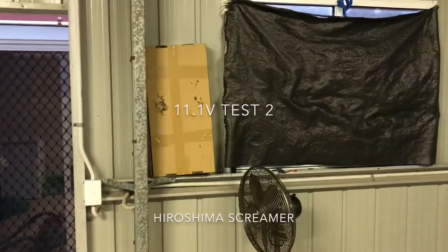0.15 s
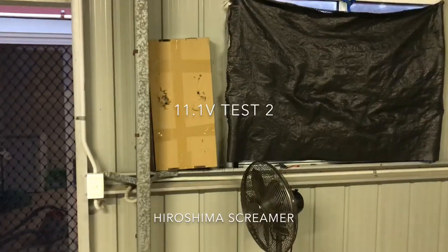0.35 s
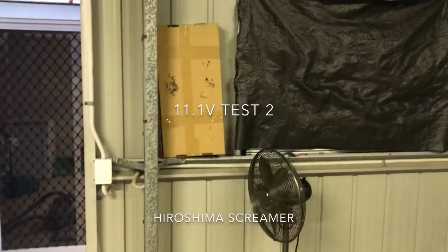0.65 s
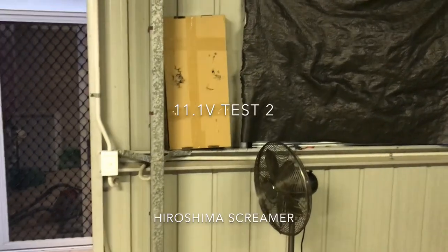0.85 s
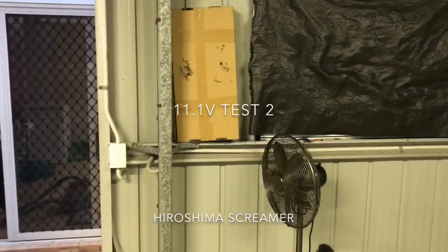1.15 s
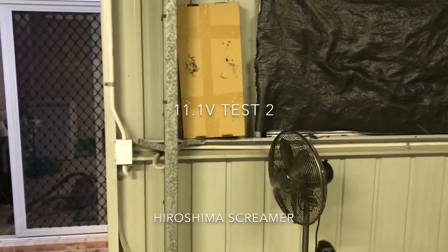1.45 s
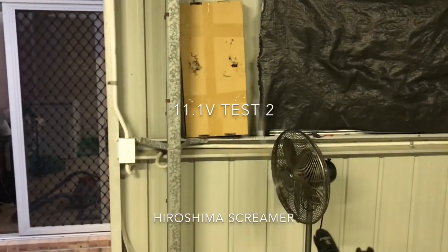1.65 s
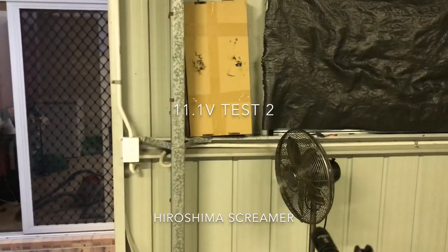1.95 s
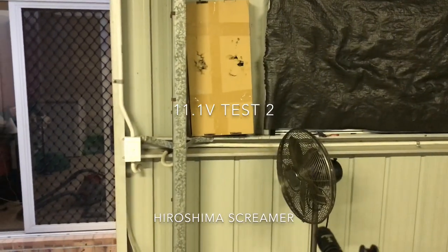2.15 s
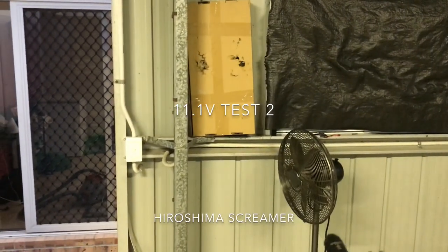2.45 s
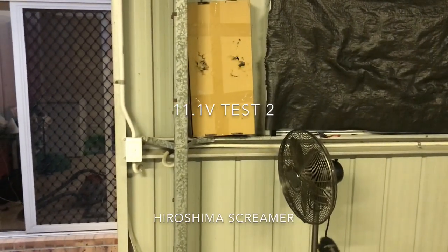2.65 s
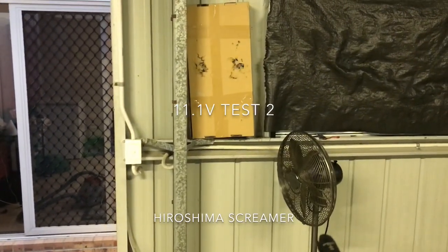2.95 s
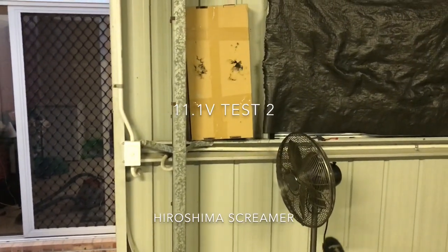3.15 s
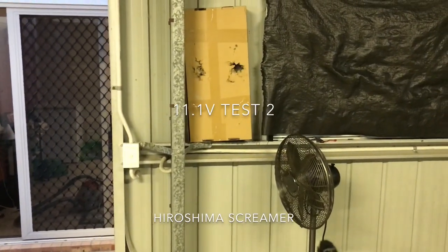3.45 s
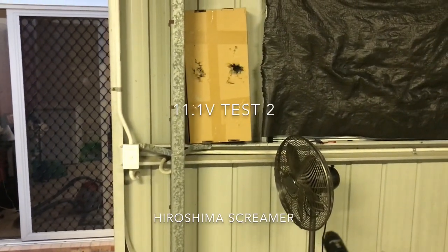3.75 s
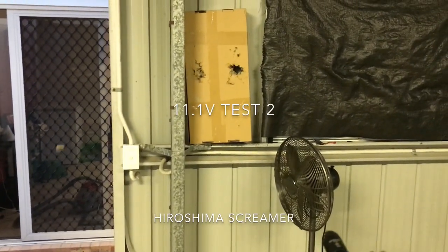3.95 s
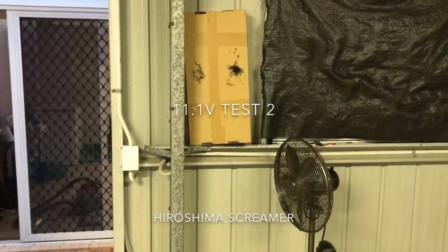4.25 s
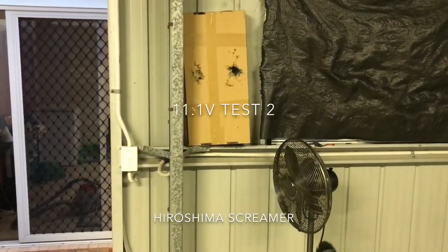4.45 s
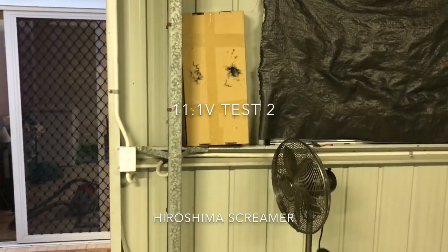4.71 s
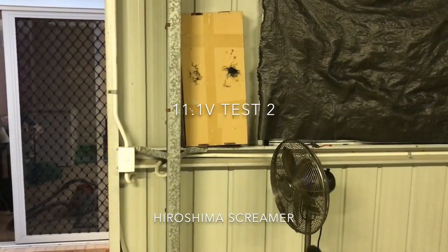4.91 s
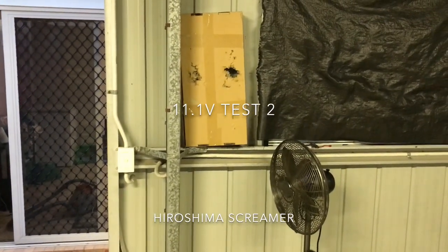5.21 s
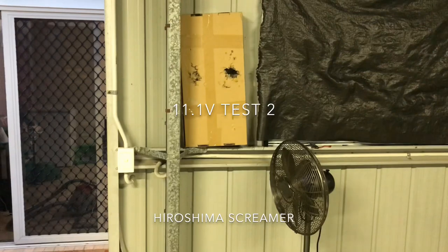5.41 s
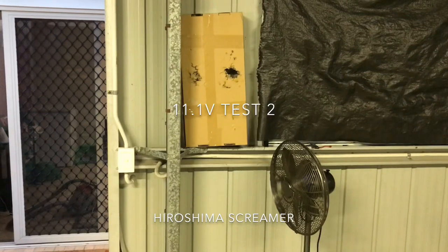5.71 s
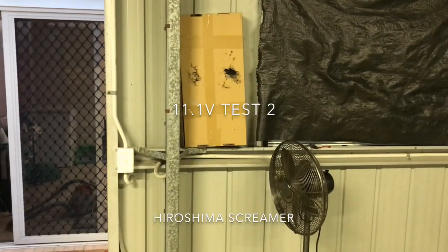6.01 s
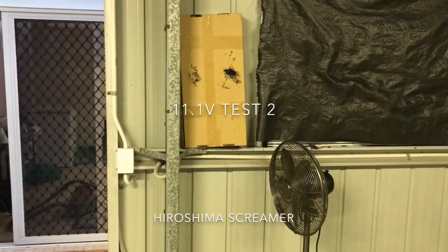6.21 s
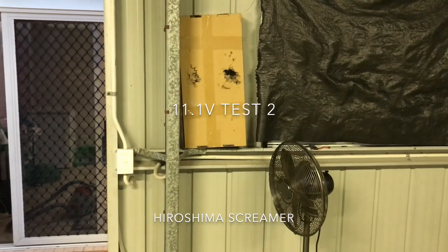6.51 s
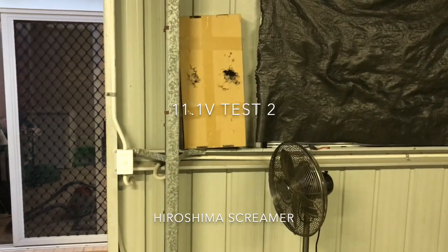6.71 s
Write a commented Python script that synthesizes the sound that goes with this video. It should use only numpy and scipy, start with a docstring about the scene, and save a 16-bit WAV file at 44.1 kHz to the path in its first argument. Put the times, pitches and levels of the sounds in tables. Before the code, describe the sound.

For the first 1.1 s there is only quiet low rumble and a very faint high electrical whine. A tiny trigger click at 1.12 s leads into a short upward gear whine, and at 1.2 s an electric gel blaster opens up close to the phone: dense, dry plastic knocks, sharp ticks and air puffs at about 21.5 per second over grinding gears. Each pellet lands some 23 ms later with a wet splat, papery crack, hollow box knock and brief ring. Fire stops about 2.2 s, the tin shed ringing on, resumes at 2.44 s and runs steadily to about 6.2 s, impacts shifting in pitch and weight, some standing out. Strong low microphone pops hit near 3.0 and 3.5 s. After another brief gap, a last burst starts at 6.35 s and continues almost to the end, around 6.9 s.

```python
"""Gel blaster in a tin shed

An electric gel blaster fires three bursts, about 21.5 shots a second, at a cardboard box.
A motor winds the piston back through whirring gears; the piston slams home as knocks, ticks and puffs.
About 23 ms later each gel ball lands: filtered pushes and noise crumples, and a ringing sine for the panel.
Now and then a stray drop or puff of air pops the microphone, a slowing sine swing.
Decaying noise echoes make the shed ring on between bursts, over a quiet rumble and a faint whine."""
import sys
import numpy as np
from scipy import signal
from scipy.fft import rfft, irfft
from scipy.io import wavfile
from scipy.ndimage import uniform_filter1d

SR = 44100
rng = np.random.default_rng(int(sys.argv[2]) if len(sys.argv) > 2 else 0)


def log_audio(samples):
    """Write samples as a 16-bit WAV file to the path given in sys.argv[1]."""
    # one column per channel
    frames = np.atleast_2d(samples).T
    # limit to full scale, then quantise
    limited = np.clip(frames, -1, 1)
    pcm = np.round(limited * 32767).astype(np.int16)
    wavfile.write(sys.argv[1], SR, pcm)


N = 302967

# Bursts of fire. Each row: motor on in seconds, first shot in seconds, motor off in seconds.
BURSTS = [(1.156, 1.2035, 2.235), (2.396, 2.4402, 6.175), (6.305, 6.3452, 6.9)]
# Spectrum of the gear noise. Each row: frequency in Hz, relative level in dB.
GEAR_SPECTRUM = [(100, -48), (400, -5), (900, 0.5), (1900, -4), (2700, -4), (4200, -7), (4900, -14),
                 (5600, -8), (7600, -12.5), (9200, -11.5), (10500, -14), (16000, -22.5)]


def amp(db):
    """Decibels to gain."""
    return 10 ** (np.asarray(db) / 20)


def unit(x):
    """Scale to rms 1."""
    return x / np.sqrt(np.mean(x ** 2) + 1e-20)


def along(points, hz):
    """Interpolate (Hz, value) points on a log frequency axis."""
    point_hz, value = np.transpose(points)
    return np.interp(np.log(hz + 1), np.log(point_hz), value)


def coloured(x, spectrum):
    """Filter x with a causal, minimum-phase response of unit energy that has this spectrum."""
    size = 4096
    gain = amp(along(spectrum, np.fft.rfftfreq(size, 1 / SR)))
    # folding the cepstrum makes the response causal
    cepstrum = irfft(np.log(gain))
    cepstrum[1:size // 2] *= 2
    cepstrum[size // 2 + 1:] = 0
    response = irfft(np.exp(rfft(cepstrum)))
    return signal.fftconvolve(x, response / np.linalg.norm(response))[:len(x)]


def add(track, start_s, sound):
    """Mix a sound into a track at a time."""
    start = int(np.clip(round(start_s * SR), 0, N))
    track[start:start + len(sound)] += sound[:N - start]


def grit(size, spiky_db):
    """Noise of rms 1 made of tiny contacts of unequal force."""
    force = np.repeat(rng.standard_normal(size // 16 + 1), 16)[:size]
    return unit(rng.standard_normal(size) * amp(spiky_db * force))


def shot_times():
    """While the motor is powered, one shot follows another at the drifting pace of the gearbox."""
    # Each row: time in seconds, interval from shot to shot in seconds.
    pace = [(1.2, .0466), (1.5, .04595), (2.0, .046), (2.2, .047), (2.44, .0463), (3.6, .0465),
            (4.3, .0466), (5.2, .0466), (5.6, .04645), (6.4, .0465)]
    pace_s, interval_s = np.transpose(pace)
    shots = []
    for _, shot_s, off_s in BURSTS:
        while shot_s < off_s:
            shots.append(shot_s)
            shot_s += np.interp(shot_s, pace_s, interval_s)
    return np.array(shots)


def piston(knock_gain_db=12.7, tick_gain_db=7.5, tick_t60_s=.0016, air_gain_db=-7,
           air_width_s=.0018, looseness_s=.00007, path_scatter_s=.0003):
    """Each slam knocks the plastic shell, ticks sharply and spits a puff of air; near walls repeat it."""
    # Contacts in a slam. Each row: delay after the shot in seconds, relative shell knock in dB,
    # relative sharp tick in dB.
    contacts = [(-.0013, -2, -5.5), (0, 1, -0.5), (.0011, 0.5, -3.5), (.0022, -5.5, -19.5)]
    # Reflections off nearby walls. Each row: delay in seconds, level in dB.
    walls = [(.0076, -11.5), (.0085, -9), (.015, -13.5)]
    # Spectra of the shell, and of the ticks and air. Each row: frequency in Hz, relative level in dB.
    shell_spectrum = [(25, -52), (45, -14), (70, -6.5), (100, -12), (135, -4.5), (190, 0.5), (270, 9),
                      (380, -20.5), (560, -6), (740, -12), (940, 4.5), (1130, -9.5), (1750, -2.5),
                      (2120, 3.5), (2500, -7), (7600, -18), (16000, -22)]
    air_spectrum = [(30, -33), (100, -18), (500, -4), (1000, -9), (2100, -9.5), (2800, -32), (4300, -12),
                    (4900, -19), (5600, -12.5), (7600, -24), (9200, -14), (10500, -21.5), (12000, -18),
                    (16000, -21)]
    slam_db, slam_scatter_db = -11, 0.98
    direct_s = .00036

    knocks, puffs = np.zeros(N), np.zeros(N)
    t = np.arange(SR // 100) / SR
    middle_s = t[-1] / 2
    puff_shape = np.exp(-.5 * ((t - middle_s) / air_width_s) ** 2)
    shots = shot_times()
    shot_levels_db = slam_db + slam_scatter_db * rng.standard_normal(len(shots))
    for shot_s, shot_db in zip(shots, shot_levels_db):
        for delay_s, path_db in [(direct_s, 0), *walls]:
            arrival_s = shot_s + delay_s + path_scatter_s * rng.standard_normal()
            level_db = shot_db + path_db
            for contact_s, knock_db, tick_db in contacts:
                touch_s = arrival_s + contact_s + looseness_s * rng.standard_normal()  # play in the parts
                add(knocks, touch_s, amp([level_db + knock_db + knock_gain_db]))
                tick_gain = amp(level_db + tick_db + tick_gain_db - 60 * t / tick_t60_s)
                add(puffs, touch_s, tick_gain * rng.standard_normal(len(t)))
            puff = puff_shape * rng.standard_normal(len(t))
            add(puffs, arrival_s - middle_s, amp(level_db + air_gain_db) * puff)
    return coloured(knocks, shell_spectrum) + coloured(puffs, air_spectrum)


def landings():
    """One ball lands a flight time after each shot; rows of time in s, splat, crack and knock in dB."""
    # Landing levels as the aim wanders over the box. Each row: time in seconds,
    # relative wet splat in dB, relative cardboard crack in dB, relative hollow box knock in dB.
    aim = [(1.3, -12, -16, -29), (1.52, -15.5, -22, -17.5), (1.8, -16.5, -27, -20.5), (1.98, -14, -19, -15),
           (2.2, -17, -16, -19), (2.5, -19.5, -17.5, -21.5), (2.88, -14.5, -24, -19),
           (3.08, -16.5, -39, -29), (3.35, -24, -26, -28), (3.65, -19, -29, -21), (3.88, -27, -16.5, -19.5),
           (4.05, -28, -19.5, -25.5), (4.24, -14.5, -14, -20), (4.52, -29, -29, -29.5),
           (4.76, -24, -16.5, -21), (4.96, -19, -32, -18), (5.28, -19, -39, -22), (5.53, -18.5, -19, -20.5),
           (5.8, -18.5, -37, -29), (6.45, -15.5, -22, -22.5), (6.87, -16, -17.5, -19.5)]
    # Balls that land squarely and stand out; same columns as the aim.
    square_hits = [(1.2238, -11, -15, -11.5), (1.3212, -11, -34, -42), (1.4578, -13.5, -16, -17),
                   (2.5121, -11.5, -10, -27), (3.2518, -16, -9.5, -22), (3.5309, -16.5, -12, -31),
                   (3.7156, -16, -29, -21), (3.8093, -12.5, -41, -17), (4.18, -21, -14, -21),
                   (4.647, -10, -35, -44), (4.6951, -27, -14.5, -18), (4.8353, -32, -12, -32),
                   (5.1126, -24, -14.5, -25), (5.3465, -14.5, -26, -19.5), (5.4846, -23, -12, -17.5),
                   (5.7655, -13.5, -21, -15), (5.857, -13, -19, -29), (5.9972, -33, -11, -20),
                   (6.0463, -29, -10.5, -28), (6.0902, -18, -12, -15.5), (6.368, -12.5, -17, -14.5),
                   (6.4631, -16, -12.5, -16)]
    flight_s, flight_scatter_s = .0228, .0008
    ball_scatter_db, part_scatter_db = 1.5, 2

    shots = shot_times()
    chance = rng.standard_normal((len(shots), 5))
    land_s = shots + flight_s + flight_scatter_s * chance[:, 0]
    aim_s, *parts_db = np.transpose(aim)
    levels_db = np.transpose([np.interp(land_s, aim_s, part_db) for part_db in parts_db])
    levels_db = levels_db + ball_scatter_db * chance[:, 1:2] + part_scatter_db * chance[:, 2:]
    hits = np.column_stack([land_s, levels_db])
    for square in square_hits:
        hits[np.argmin(np.abs(land_s - square[0]))] = square
    return hits


def smacks(hits, spectrum, t60_s, gain_db, push_db, spiky_db):
    """One part of every landing: a single push, and a short crumple that dies away."""
    track, t = np.zeros(N), np.arange(SR // 16) / SR
    for hit_s, hit_db in hits:
        add(track, hit_s, amp([hit_db + push_db]))
        add(track, hit_s, amp(hit_db + gain_db - 60 * t / t60_s) * grit(len(t), spiky_db))
    return coloured(track, spectrum)


def panel(times_s, ring_db=4, detune=0.048):
    """Every landing rings the cardboard at a pitch set by where it strikes."""
    # Panel under the point of aim. Each row: time in seconds, pitch in Hz, relative level in dB.
    ringing = [(1.22, 672, -14), (1.55, 590, -22.5), (1.75, 570, -46), (2.0, 530, -14), (2.3, 580, -41),
               (2.5, 1114, -17.5), (2.75, 1147, -20), (3.1, 973, -21.5), (3.72, 1220, -28),
               (3.85, 1195, -15), (4.1, 1210, -13.5), (4.28, 1180, -46), (4.36, 570, -23),
               (4.8, 614, -20.5), (5.3, 576, -20.5), (5.7, 574, -33), (6.87, 612, -21.5)]
    when_s, pitch_hz, pitch_db = np.transpose(ringing)
    t60_s = .06
    track, t = np.zeros(N), np.arange(SR // 8) / SR
    for hit_s, (pitch_chance, force_db) in zip(times_s, rng.standard_normal((len(times_s), 2))):
        hz = np.interp(hit_s, when_s, pitch_hz) * (1 + detune * pitch_chance)
        level_db = np.interp(hit_s, when_s, pitch_db) + ring_db + force_db
        add(track, hit_s, amp(level_db - 60 * t / t60_s) * np.sin(2 * np.pi * hz * t))
    return track


def target():
    """The gel splats, the cardboard face cracks and rings, and the box knocks."""
    # Spectra of the three parts. Each row: frequency in Hz, relative level in dB.
    splat_spectrum = [(900, -50), (2400, 1), (3800, 3), (4900, 0.5), (5500, 0.5), (7600, -10), (9200, -2.5),
                      (10500, -9.5), (16000, -12)]
    crack_spectrum = [(60, -36.5), (500, -10), (900, 0), (1220, -2), (1600, -2.5), (2200, -9), (3200, -7.5),
                      (8000, -34.5)]
    box_spectrum = [(50, -64), (130, -13.5), (300, -3), (430, -3.5), (600, 1), (760, -8), (900, 0),
                    (1200, -41), (4000, -24)]
    box_lag_s = .0018  # the hollow answers just after the face

    hits = landings()
    box_hits = hits[:, [0, 3]] + [box_lag_s, 0]
    splat = smacks(hits[:, [0, 1]], splat_spectrum, t60_s=.06, gain_db=-3, push_db=18, spiky_db=-0.5)
    crack = smacks(hits[:, [0, 2]], crack_spectrum, t60_s=.073, gain_db=2, push_db=3, spiky_db=2.5)
    knock = smacks(box_hits, box_spectrum, t60_s=.068, gain_db=1.5, push_db=19.5, spiky_db=6)
    return splat + crack + knock + panel(hits[:, 0])


def spatter(fall_db=9):
    """Fragments of a burst ball rattle over the box and wall as short band-shaped grit."""
    # Each row: start in seconds, length in seconds, relative level in dB, centre frequency in Hz.
    sprays = [(1.205, 0.021, -14, 1770), (1.239, 0.026, -12, 760), (1.286, 0.019, -22, 750),
              (1.327, 0.028, -14, 7350), (2.515, 0.021, -21, 2000), (4.648, .006, -29, 4460),
              (5.991, 0.024, -19.5, 1590), (6.033, .025, -37, 1600), (6.088, 0.0068, -13, 700)]
    track, t = np.zeros(N), np.arange(SR // 8) / SR
    for start_s, length_s, db, hz in sprays:
        spray = grit(len(t), spiky_db=3) * np.exp(-(t / length_s) ** 4)
        spectrum = [(hz / 8, -2 * fall_db), (hz / 2, -2), (hz, 0), (hz * 8, -2 * fall_db)]
        add(track, start_s, amp(db) * coloured(spray, spectrum))
    return track


def gearbox(gear_db=-28, spin_up_s=.022, coast_s=.018, sag=0.03, teeth=0.82, load_db=2):
    """The motor spins up, sags as it winds the spring and coasts; its gear teeth grind and whine."""
    # Gear whine. Each row: multiple of the motor speed, relative level in dB.
    whine_orders = [(3, -37), (5, -47.5), (10, -71), (20, -41)]
    gear_ratio = 18.83  # motor turns per shot

    t = np.arange(N) / SR
    shots = shot_times()
    running = np.zeros(N)  # 0 at rest to 1 at full speed
    for on_s, _, off_s in BURSTS:
        rise = 1 - np.exp(-np.maximum(t - on_s, 0) / spin_up_s)
        running += rise * np.exp(-np.maximum(t - off_s, 0) / coast_s)
    stroke = 2 * np.pi * np.interp(t, shots, np.arange(len(shots)))
    shots_per_s = 1 / np.median(np.diff(shots))
    motor_hz = gear_ratio * shots_per_s * running * (1 + sag * np.sin(stroke))
    shaft = 2 * np.pi * np.cumsum(motor_hz) / SR
    mesh = 1 + teeth * np.cos(10 * shaft)  # ten teeth on the pinion
    turn = 1 + teeth * np.cos(shaft)
    grind = amp(gear_db) * coloured(grit(N, spiky_db=7) * mesh * turn, GEAR_SPECTRUM)
    whine = sum(amp(db) * np.sin(round(order) * shaft) for order, db in whine_orders)
    load = amp(load_db * np.sin(stroke))
    return np.sqrt(running) * load * (grind + whine)


def trigger(click_db=-52, kick_db=-18, strain_db=-20, whine_db=-23, from_hz=950, to_hz=2400):
    """The trigger clicks, the gears take up their slack and whine upwards through the first winding."""
    click_s, click_t60_s, kick_t60_s = 1.119, .037, .0064
    track, t = np.zeros(N), np.arange(SR // 16) / SR
    start_s, first_shot_s, _ = BURSTS[0]
    wound = t / (first_shot_s - start_s)  # 0 to 1 as the spring is drawn back
    straining = np.sqrt(wound) * (wound < 1)
    click, rasp = rng.standard_normal((2, len(t)))
    add(track, click_s, amp(click_db - 60 * t / click_t60_s) * click)
    rasp_gain = amp(kick_db - 60 * t / kick_t60_s) + amp(strain_db) * straining
    add(track, start_s, rasp_gain * rasp)
    track = coloured(track, GEAR_SPECTRUM)
    whine_hz = from_hz + (to_hz - from_hz) * wound
    whine = np.sin(2 * np.pi * np.cumsum(whine_hz) / SR)
    add(track, start_s, amp(whine_db) * straining * whine)
    return track


def pops(pop_db=-4):
    """A blow on the microphone swings it to and fro, ever more slowly and weakly."""
    # Each row: start in seconds, relative level in dB.
    blows = [(1.224, -2), (1.275, 1), (3.019, 12.5), (3.483, 11), (5.3, -11), (5.65, -6.5), (5.695, -15),
             (5.79, -16), (5.904, -4.5), (6.093, -11), (6.165, -6.5), (6.342, -13), (6.389, -19),
             (6.791, -11)]
    first_cycle_s, slowing, life_s = .002, .41, .024
    track, t = np.zeros(N), np.arange(SR // 8) / SR
    swing = np.sin(2 * np.pi * (t / first_cycle_s) ** slowing)
    swing *= np.exp(-(t / life_s) ** 2)
    swing /= (1 + t / first_cycle_s) ** .25
    for start_s, db in blows:
        add(track, start_s, amp(db + pop_db) * swing)
    return track


def shed(x, tail_db=-3.5, count=7, build_up_s=.016):
    """Each frequency of the tail dies at its own speed; the echo pattern drifts as the microphone moves."""
    # Decay of the tail. Each row: frequency in Hz, t60 in seconds.
    decay = [(150, 1), (400, 0.58), (1000, 0.69), (2800, 0.89), (7300, 0.44), (15000, 0.36)]
    # Colour of the tail. Each row: frequency in Hz, relative level in dB.
    tail_colour = [(60, -17), (200, -2), (330, -3.5), (600, -2), (760, -1.5), (920, -1), (1090, -9),
                   (1400, 2), (2100, -4), (6000, -3.5), (15000, 2.5)]
    heard = x.copy()
    place = np.linspace(0, count - 1, N)
    for spot in range(count):
        hz, t, bins = signal.stft(rng.standard_normal(SR), SR, nperseg=256)
        fade_db = along(tail_colour, hz)[:, None] - 60 * t / along(decay, hz)[:, None]
        build_up = 1 - np.exp(-t / build_up_s)
        tail = signal.istft(bins * amp(fade_db) * build_up, SR, nperseg=256)[1]
        tail *= amp(tail_db) / np.linalg.norm(tail)
        # crossfade from one spot's echo pattern to the next
        near = np.flatnonzero(np.abs(place - spot) < 1)
        part = x[near] * np.cos(np.pi / 2 * (place[near] - spot))
        add(heard, near[0] / SR, signal.fftconvolve(part, tail))
    return heard


def background():
    """A quiet rumble of shaped noise, and a faint electrical whine of steady sines."""
    # Spectrum of the quiet. Each row: frequency in Hz, relative level in dB.
    quiet_spectrum = [(25, -26), (55, -3), (80, -2.5), (130, -10.5), (250, -10.5), (480, -16.5),
                      (620, -12.5), (800, -16), (1300, -22), (2000, -28.5), (2800, -39), (5000, -44),
                      (15000, -49)]
    # Each row: frequency in Hz, rms level in dB.
    whine_tones = [(3984, -88), (5975, -88), (6971, -91), (8963, -92), (9959, -94)]
    t = np.arange(N) / SR
    rumble = amp(-52.5) * coloured(rng.standard_normal(N), quiet_spectrum)
    whine = sum(amp(db) * np.sqrt(2) * np.sin(2 * np.pi * hz * t) for hz, db in whine_tones)
    return rumble + whine


def scene():
    """Blaster and target in the shed, with microphone pops, over the quiet background."""
    firing = piston() + target() + spatter() + gearbox() + trigger()
    return (amp(2.0) * shed(firing) + pops() + background())[None]


def gain_control(x, ceiling_db=-2.0, recover_db_per_s=10):
    """A level over the ceiling turns the gain down at once; it creeps back afterwards."""
    power = np.abs(uniform_filter1d(x ** 2, size=SR // 100))  # 10 ms mean
    over_db = np.maximum(10 * np.log10(power + 1e-12) - ceiling_db, 0)
    recovered_db = recover_db_per_s * np.arange(N) / SR
    cut_db = np.maximum.accumulate(over_db + recovered_db, axis=-1) - recovered_db
    return x * amp(-cut_db)


def record(dry):
    """The phone thins the deepest bass, ducks when loud, rounds off peaks and low-passes at 16 kHz."""
    high_pass = signal.butter(1, 18, "highpass", fs=SR, output="sos")
    lean = signal.sosfilt(high_pass, dry)
    held = gain_control(lean)
    rounded = held / (1 + np.abs(held) ** 6) ** (1 / 6)
    low_pass = signal.firwin(255, 16000, fs=SR, window="blackman")
    return signal.fftconvolve(rounded, low_pass[None], mode="same")


dry = scene()
out = record(dry)
log_audio(out)
```